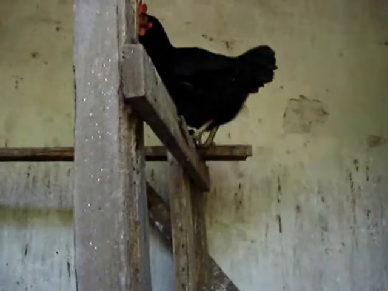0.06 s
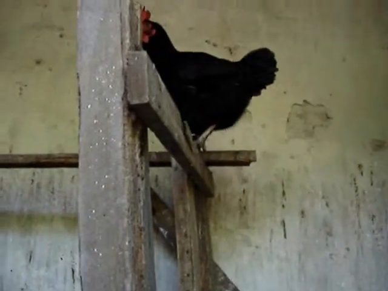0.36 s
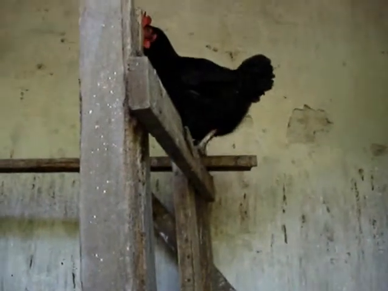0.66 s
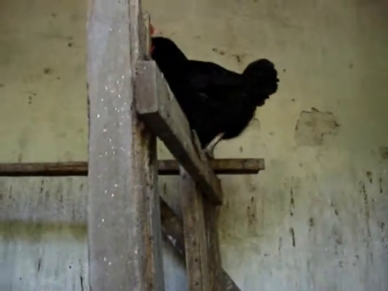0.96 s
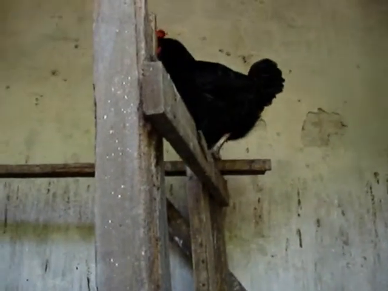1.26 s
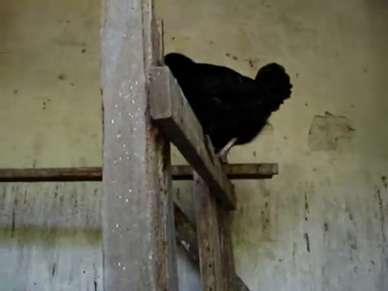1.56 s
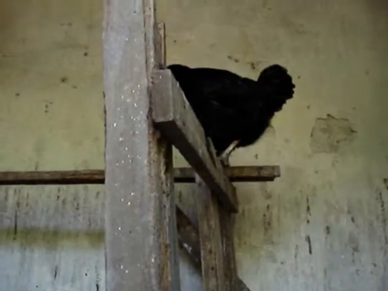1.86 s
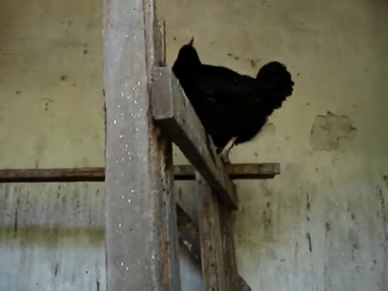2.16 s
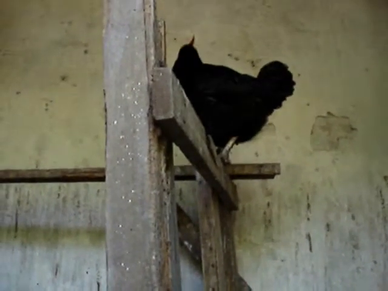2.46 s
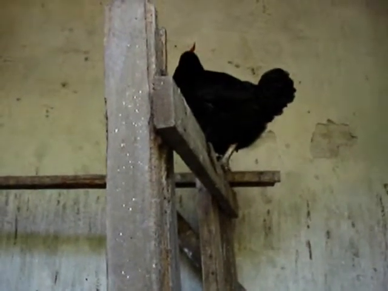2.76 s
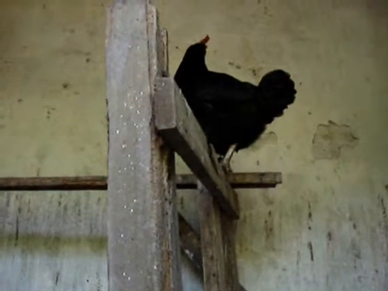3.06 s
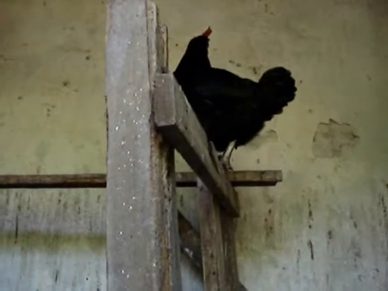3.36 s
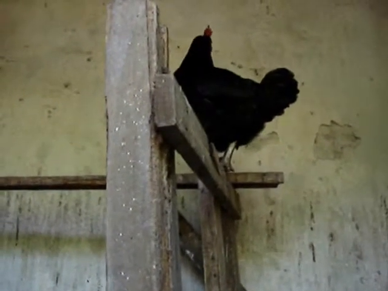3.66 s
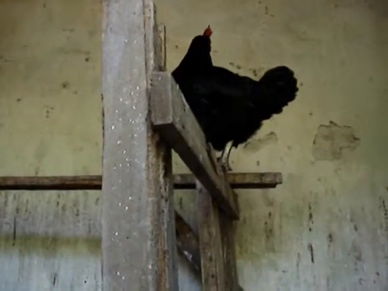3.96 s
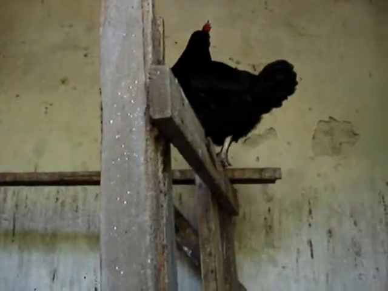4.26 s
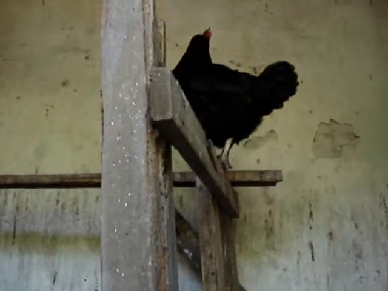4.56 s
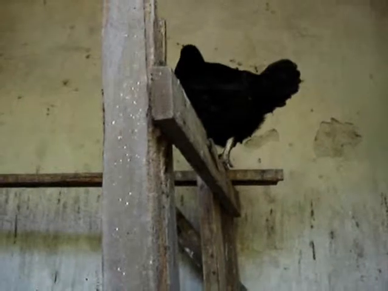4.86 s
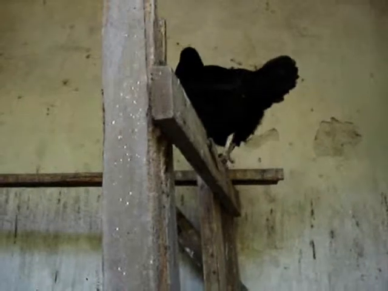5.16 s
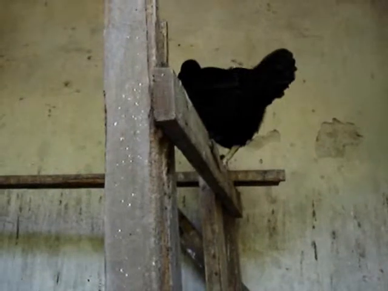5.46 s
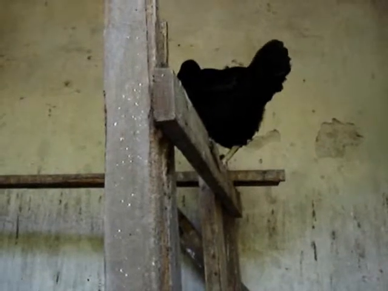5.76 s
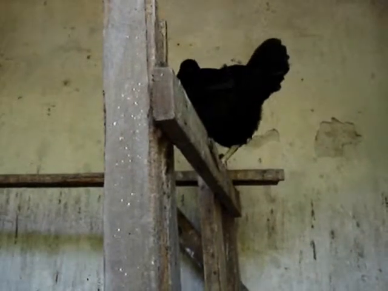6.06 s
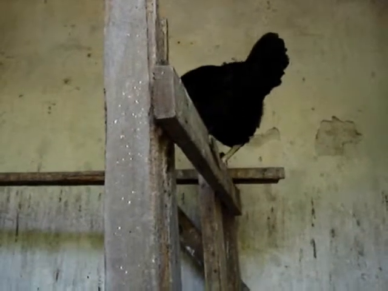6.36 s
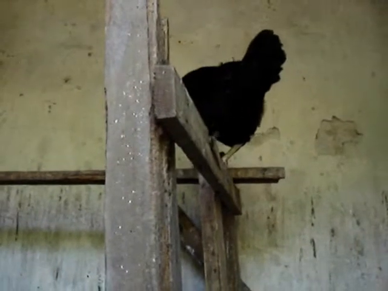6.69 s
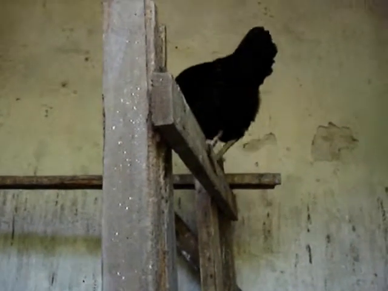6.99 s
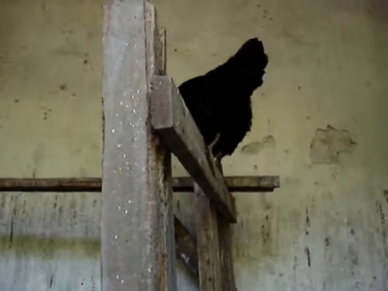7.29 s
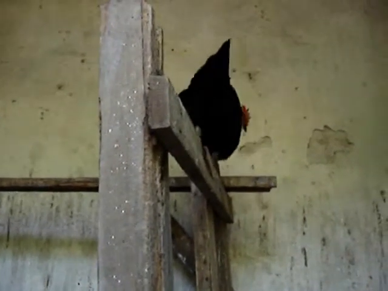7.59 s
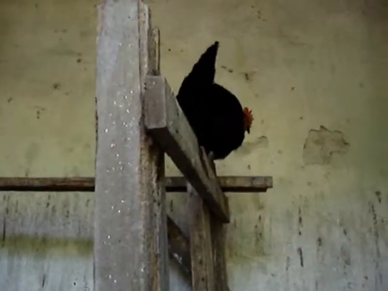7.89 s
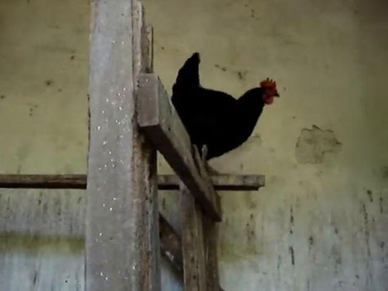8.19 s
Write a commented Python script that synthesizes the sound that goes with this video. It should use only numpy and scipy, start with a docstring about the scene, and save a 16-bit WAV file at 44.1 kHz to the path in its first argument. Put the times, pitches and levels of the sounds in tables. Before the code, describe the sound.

A hen calls nearby in a small coop whose hard walls add a short echo, over a faint, dull, steady outdoor background. She gives a tiny call right at the start. From 0.2 to 1.6 seconds she holds one long wavering note, thin and high at first, then lower, louder and gritty, breaking into a rasp. From about 1.7 to 6 seconds comes a run of about a dozen short falling notes, roughly three a second, the first ones the loudest. Most open with a soft throaty cluck and a hoarse catch, and end roughly. The last, near 5.8 seconds, is especially rattly. After a second of only background, from about 7 to 8 seconds her feet make several faint, grainy scrapes on the wooden perch, with light swishes of feathers as she turns.

```python
"""In a small plastered coop, with a dull yard behind, a hen on a perch gives a brief call and one long
wavering note, then a run of short falling ones with soft clucks. Her voice box (the syrinx) starts most
notes with a hoarse catch, clears, adds a tone at half the pitch ("doubling") and ends in a rasp. Then she
turns round, feet scraping and feathers rustling, and the walls echo it all. A small camera holds each of
its samples until the next, which mirrors her voice faintly into the top treble."""
import sys
import numpy as np
from scipy import signal
from scipy.fft import rfft, irfft, next_fast_len
from scipy.io import wavfile
from scipy.ndimage import map_coordinates

SR = 44100
rng = np.random.default_rng(int(sys.argv[2]) if len(sys.argv) > 2 else 0)


def inscribe(sig):
    """Save sig as 16-bit PCM at rate SR to the path in sys.argv[1].

    A 1-D sig is mono; a 2-D sig holds one channel per row.
    Samples are clipped to [-1, 1] before scaling.
    """
    pcm = np.round(np.clip(np.atleast_2d(sig).T, -1, 1) * 32767)
    wavfile.write(sys.argv[1], SR, pcm.astype(np.int16))


N = 362972
TIME = np.arange(N) / SR


def from_db(db):
    """Turn decibels into a number to multiply by."""
    return 10 ** (np.asarray(db) / 20)


def unit_power(x):
    """Scale a signal so that its average power is 1."""
    return x / np.sqrt(np.mean(x ** 2) + 1e-20)


def curves_at(rows, t):
    """Read each column of a table at the times t; the first column is time."""
    times, *columns = np.transpose(rows)
    return [np.interp(t, times, column) for column in columns]


def gain_at(spectrum, hz):
    """How strongly a spectrum passes each frequency; it falls away steeply past its ends."""
    points_hz, db = np.transpose(spectrum)
    hz = np.maximum(hz, 1)
    roll_off = np.minimum(1, np.minimum(hz / points_hz[0], points_hz[-1] / hz)) ** 2
    return from_db(np.interp(np.log(hz), np.log(points_hz), db)) * roll_off


def coloured(noise, spectrum):
    """Give noise the tone colour of a spectrum, at power 1."""
    size = next_fast_len(len(noise))
    hz = np.arange(size // 2 + 1) * SR / size
    return unit_power(irfft(rfft(noise, size) * gain_at(spectrum, hz), size)[:len(noise)])


def flutter(rate_hz, size):
    """Smooth random wavering, up to about rate_hz, at power 1."""
    position = np.arange(size) * 2 * rate_hz / SR + rng.random()
    points = rng.standard_normal(int(position[-1]) + 8)
    return unit_power(map_coordinates(points, [position + 2], order=3))


def burst(start_s, rise_s, decay_s):
    """A loudness curve that swells quickly and dies away."""
    age = np.maximum(TIME - start_s, 0)
    decay = np.minimum(np.maximum(age - rise_s, 0) / decay_s, 20)
    return np.minimum(age / rise_s, 1) * np.exp(-decay)


def times_between(start_s, end_s):
    """The sample times between two moments."""
    return TIME[(TIME > start_s) & (TIME < end_s)]


def after(t, moment_s, change_s=.028):
    """A ramp from 0 to 1 around a moment: the voice takes a little time to change state."""
    return np.clip((t - moment_s) / change_s + .5, 0, 1)


def yard():
    """Steady, dull outdoor background noise."""
    # the yard's tone colour: frequency_hz, gain_db
    colour = [(15, -52), (25, -12.5), (101, -6), (253, -6.5), (315, -0.5), (400, -3.5), (509, -5.5),
              (762, -6.5), (2360, -22), (6550, -29), (8130, -26), (15500, -55)]
    # its loudness: time_s, level_db
    loudness = [(2,-41),(3,-45),(6.7,-45.5),(8.2,-44)]
    level_db, = curves_at(loudness, TIME)
    return from_db(level_db) * coloured(rng.standard_normal(N), colour)


def syrinx(t, pitch_hz, level_db, overtones_db, throat_hz, bright_db, hoarseness, doubles_at_s,
           doubling, final_rasp, rattle, tremor=.0079, waver_db=1.17, harden_db=13, harden_share=.73):
    """One note: the voice box catches, buzzes, doubles as every other cycle differs, then rasps."""
    # how the throat and beak ring at rest, low down and higher up: frequency_hz, gain_db
    throat = [(290,-22),(480,-20.5),(800,1.5),(1100,4),(1400,3.5),(1700,-10.5),(2000,-19.5),(2500,-27.5),(3200,-31)]
    upper_resonance = [(1900,5),(2400,-11),(3050,-5),(3430,5.5),(3750,-3.5),(4300,-11),(5000,-31),(5850,-10),(7200,-34),(9000,-22),(15000,-34.5)]
    # the voice cracks with a few very strong cycles: time_s, extra_db
    cracks = [(2.061, 2), (5.502, 8), (5.931, 9)]
    onset_s, break_s, crack_s, attack_s, release_s = .051, .072, .0053, .0052, .01
    rattle_hz, resting_throat_hz = 51.77, 1170
    size = len(t)

    catching = hoarseness * (1 - after(t, t[0] + onset_s))
    broken = final_rasp * after(t, t[-1] - break_s)
    rasp = .095 + np.maximum(np.maximum(catching, broken), .21 * rattle)
    # a rattling voice box throbs unevenly
    throb_hz = rattle_hz * (1 + flutter(39.5, size) / 2)
    throb = rattle * np.sin(2 * np.pi * np.cumsum(throb_hz) / SR)
    pitch_hz = pitch_hz * (1 - .0593 * broken)  # the final rasp pulls the pitch down
    wobble = .0475 * rasp * flutter(240, size) + tremor * flutter(42.2, size) + .011 * throb
    phase = 2 * np.pi * np.cumsum(pitch_hz * (1 + wobble)) / SR

    # partials are the pure tones in a note; doubling adds some halfway between the usual ones
    multiples = np.arange(.5, 20, .5)[:, None]
    halfway = multiples % 1 > 0
    strength = np.where(halfway, doubling * after(t, doubles_at_s) + catching, multiples > 1)
    strength = strength * from_db(.11 * bright_db * np.minimum(multiples, 4))
    # in a rattle the doubling slips out of step, and uneven cycles fray each partial
    slip = halfway * .75 * rattle * flutter(36, size)
    unevenness = .55 * rattle
    wavers = np.array([flutter(70, size) for _ in range(5)])
    fray = unevenness * wavers[np.arange(len(multiples)) % 5]
    start_phases = rng.uniform(0, 2 * np.pi, multiples.shape)
    partials = (1 + fray) * np.sin(multiples * phase + slip + fray[::-1] + start_phases)
    partials = partials / np.sqrt(1 + unevenness ** 2)

    def through(resonance, air_share, shift=1):
        """The buzz and the air that escapes on each cycle, shaped by one resonance."""
        gains = gain_at(resonance, multiples * (pitch_hz / shift)[::32])
        gains = strength * np.repeat(gains, 32, axis=1)[:, :size]
        buzz = (gains * partials).sum(axis=0) / np.sqrt((gains ** 2).sum(axis=0) / 2)
        puffs = rng.standard_normal(size) * (1 + np.cos(phase))
        air = coloured(puffs, [(hz * np.mean(shift), db) for hz, db in resonance])
        return (buzz + air_share * air) / np.sqrt(1 + air_share ** 2)

    # the pulses harden as the note goes on, adding a flickering bright edge that cracks do not lift
    hardening = np.minimum(np.linspace(0, 1, size) / harden_share, 1)
    crack_db = sum(db * np.exp(-((t - time_s) / crack_s) ** 2) for time_s, db in cracks)
    edge_db = -26 + bright_db + harden_db * hardening - 2.5 * broken
    edge_db = edge_db + 1.5 * flutter(34.45, size) - crack_db
    # stretching the neck shifts the throat's resonance
    body = through(throat, from_db(-11) * 2 * rasp, shift=throat_hz / resting_throat_hz)
    edge = from_db(edge_db) * through(upper_resonance, from_db(1) * (rattle + rasp + catching))
    # the beak starts half closed, which muffles the overtones
    overtones = from_db(overtones_db - 12 * np.exp(-(t - t[0]) / onset_s))
    voice = (np.sqrt(2) * np.sin(phase) + overtones * (body + edge)) / np.hypot(1, overtones)

    fades = np.clip((t - t[0]) / attack_s, 0, 1) * np.clip((t[-1] - t) / release_s, 0, 1)
    level_db = level_db + waver_db * flutter(33.8, size) + 3 * throb + crack_db
    shimmer = 1 + .26 * rasp * flutter(45, size)
    out = np.zeros(N)
    first = np.searchsorted(TIME, t[0])
    out[first:first + size] = from_db(level_db) * voice * fades * shimmer
    return out


def cackles():
    """Short notes slide to a held pitch, start doubling, then sag; each swells and fades."""
    # one row a note: start_s, length_s, opening_hz, slide_s, held_hz, sag_hz_per_s, level_db (relative),
    # swell_s, swell_db, overtones_db, throat_hz, bright_db, then 0 to 1: hoarseness, doubling,
    # final_rasp, rattle
    notes = [(0.036, 0.0522, 636, 0.032, 547, 504, -26.5, 0.021, 6.5, 8.5, 1040, -16, 0.02, 0.5, 0.57, .2),
             (1.74, 0.0378, 1051, 0.0307, 1080, 300.6, -13, 0.0094, 4, -22, 1106, -10, 0.2, 0.21, 0.07, 0.3),
             (1.797, 0.3, 790.6, 0.041, 710, 114, -8.5, 0.31, 10, 2, 1096, 0.5, 0.13, 1, 0.22, 0.21),
             (2.221, 0.041, 997, 0.015, 1048, 300, -14.5, 0.015, 6, -11, 1110, -3, 0.12, 0.26, 0, 0.1),
             (2.24, 0.31, 762, 0.12, 554.2, 68.3, -11, 0.097, 16.5, 9, 1170, -1, 0.88, 0.31, 0.43, 0.33),
             (2.653, 0.28, 726.5, 0.078, 574.3, 213.6, -11, 0.1, 17.5, 9.5, 1190, 2, 0.53, 0.21, 0.57, 0.2),
             (3.044, 0.19, 751.4, 0.1, 567.2, 254, -11.5, 0.11, 13, 6.5, 1190, 0, 0.54, 0.19, 0.31, 0.44),
             (3.352, 0.036, 1064, 0.019, 1020, 300, -19, 0.013, 9.5, -7, 1100, 0, 0.3, 0.2, 0.02, .2),
             (3.366, 0.228, 708, 0.052, 538, 382.5, -14.5, 0.05, 18, 8, 1180, 4, 0.47, 0.18, 0.6, 0.4),
             (3.701, 0.209, 737.4, .057, 554.7, 386, -13.5, 0.09, 8.5, 7, 1224, 3.5, 0.57, 0.22, 0.28, 0.5),
             (4.026, 0.2284, 694, 0.04174, 526, 300.5, -13.5, 0.0645, 11.5, 9, 1143, 5.5, 0.23, 0.22, 0.49, 0.51),
             (4.376, 0.2, 659, .047, 489.9, 180, -15.5, 0.029, 13.5, 10, 1154, 6.5, 0.09, 0.12, 0.26, 0.15),
             (4.68, 0.22, 644.3, 0.044, 513.7, 235, -12.5, 0.034, 18, 8.5, 1123, 1.5, 0.27, 0.12, 0.41, 0.39),
             (4.997, .2, 756.8, 0.064, 590, 299, -12.5, 0.098, 17, 9.5, 1064, -3, 0.44, 0.83, 0.48, 0.31),
             (5.322, 0.22, 755, 0.067, 602.4, 58, -14.5, 0.15, 11, 10, 1120, 1, 0.37, 0.9, 0.61, 0.48),
             (5.782, 0.2, 671.6, 0.048, 600.3, 51, -14.5, 0.18, 2.5, 11.5, 1130, -1, 0.13, 0.56, 0.52, 0.74)]
    fade_share, fade_db = .25, 12
    out = np.zeros(N)
    for (start_s, length_s, opening_hz, slide_s, held_hz, sag_hz_per_s, level_db, swell_s, swell_db,
         overtones_db, throat_hz, bright_db, hoarseness, doubling, final_rasp, rattle) in notes:
        t = times_between(start_s, start_s + length_s)
        age = t - start_s
        slide_hz = (opening_hz - held_hz) * np.maximum(1 - age / slide_s, 0)
        pitch_hz = held_hz + slide_hz - sag_hz_per_s * np.maximum(age - slide_s, 0)
        fading = np.maximum(1 - (1 - age / length_s) / fade_share, 0)
        level_db = level_db - swell_db * np.maximum(1 - age / swell_s, 0) - fade_db * fading
        # the beak opens and closes, lifting the throat's resonance at its widest
        gape = np.sin(np.pi * age / length_s)
        throat_hz = throat_hz * (1 + .064 * (gape - gape.mean()))
        rattle = rattle * after(t, start_s + slide_s / 2)
        out += syrinx(t, pitch_hz, level_db, overtones_db, throat_hz, bright_db, hoarseness,
                      start_s + slide_s, doubling, final_rasp, rattle)
    return out


def long_note():
    """A drawn-out tone that gathers strength, doubles faintly and breaks at the end."""
    # a thin high start sinks to a held tone: time_s, pitch_hz
    melody = [(.187,681),(0.211,682),(0.223,891),(0.409,770.6),(0.508,796),(0.539,734),(.65,622),(0.709,604.7),(0.786,652.6),(0.876,607),(0.951,636.4),(1.012,603.7),(1.115,654.3),(1.51,664.2),(1.544,608),(1.61,618)]
    # the note's loudness, swelling and dipping in the room as the pitch moves: time_s, level_db (relative)
    loudness = [(0.187, -18.5), (0.193, -27), (0.563, -27.5), (0.655, -14), (0.705, -12), (0.741, -18.5),
                (0.789, -14.5), (0.831, -21), (0.875, -10.5), (0.927, -17), (0.939, -23), (1.017, -8.5),
                (1.061, -18), (1.125, -10.5), (1.247, -16.5), (1.251, -14), (1.517, -11), (1.601, -15.5),
                (1.61, -23)]
    # the beak opens wider, from hoot to cackle: time_s, overtones_db (compared with the main tone)
    beak = [(.2,8),(.25,-20),(.45,-9.5),(.56,0),(.66,-9),(1.02,-1),(1.1,-4),(1.5,-4),(1.57,16)]
    # gritty on the way down, calmer, then rough again: time_s, rattle (0 to 1), doubling (0 to 1)
    roughness = [(.45,0.23,0),(.58,0.48,0),(1.05,0.23,0.05),(1.4,0.26,0.17),(1.53,0.35,0.43)]
    t = times_between(melody[0][0], melody[-1][0])
    pitch_hz, = curves_at(melody, t)
    level_db, = curves_at(loudness, t)
    overtones_db, = curves_at(beak, t)
    rattle, doubling = curves_at(roughness, t)
    return syrinx(t, pitch_hz, level_db, overtones_db, throat_hz=1079, bright_db=-8.5, hoarseness=.054,
                  doubles_at_s=t[0], doubling=doubling, final_rasp=.26, rattle=rattle,
                  tremor=.018, waver_db=1.9, harden_db=22.5, harden_share=.94)


def clucks():
    """Soft, toneless knocks of air in the throat as the beak opens before a note."""
    # one row a knock: start_s, level_db (relative)
    knocks = [(1.723, -2.5), (2.199, -7), (2.642, -10.5), (3.024, -8.5), (3.336, -14.5), (3.685, -13),
              (4.014, -18), (4.358, -11.5), (4.668, -13.5), (4.994, -7.5), (5.311, -9), (5.714, -17.5)]
    # their tone colour: frequency_hz, gain_db
    colour = [(400,-16),(750,6),(1100,-3.5),(1500,-17),(3000,-27.5)]
    loudness = sum(from_db(db - 14.5) * burst(start_s, rise_s=.01, decay_s=.014)
                   for start_s, db in knocks)
    return loudness * coloured(rng.standard_normal(N), colour)


def rustles():
    """Feet scrape the wood and feathers swish as she turns: a grainy brush for each movement."""
    # her movements: start_s, feet_db, feathers_db (both relative), decay_s
    moves = [(6.96, -40, -62, .04), (7.198, -33.5, -51, .035), (7.392, -35, -64.5, .025),
             (7.462, -32, -44, .018), (7.555, -34.5, -43.5, 0.042), (7.652, -39, -46.5, 0.12),
             (7.9, -34, -52, .03), (7.945, -34, -63, .025)]
    # tone colours of feet and of feathers: frequency_hz, gain_db
    scrape = [(1500,0),(2500,2.5),(4000,-11)]
    swish = [(4000,1.5),(8000,0.5),(11000,-15),(15000,-20)]
    starts_s, feet_db, feathers_db, decays_s = np.transpose(moves)
    out = np.zeros(N)
    for levels_db, colour in (feet_db - 14.5, scrape), (feathers_db - 6, swish):
        loudness = sum(from_db(db) * burst(start_s, rise_s=.006, decay_s=decay_s)
                       for start_s, db, decay_s in zip(starts_s, levels_db, decays_s))
        grains = rng.standard_normal(N) * from_db(3 * flutter(254, N))
        out += loudness * coloured(grains, colour)
    return out


def coop(sound, ring_s=.29, tail_db=-7, wall_cutoff_hz=3900):
    """Dull slaps off the nearest walls, then a short tail of echoes going back and forth."""
    # echoes off the nearest walls: delay_s, gain
    walls = [(.0083,0.12),(.0165,0.5),(.0229,.2)]
    hz = np.arange(SR // 2 + 1)
    delayed = lambda delay_s: np.exp(-2j * np.pi * hz * delay_s)
    round_trips_s = np.geomspace(.0198, .047, 12)
    trips = [from_db(-60 * trip_s / ring_s) * delayed(trip_s) for trip_s in round_trips_s]
    echoes = sum((-1) ** k * trip / (1 - trip) for k, trip in enumerate(trips))
    for scatter_s in .0013, .0037:  # the beams scatter each echo
        echoes = echoes * (delayed(scatter_s) - .6) / (1 - .6 * delayed(scatter_s))
    dulling = gain_at([(100, -3.5), (4000, -11.5), (12000, -15)], hz)
    tail = irfft(echoes * dulling)[:SR // 2]
    tail *= from_db(tail_db) / np.sqrt(2 * np.sum(tail ** 2))
    slaps = sum(gain * np.interp(TIME - delay_s, TIME, sound, left=0) for delay_s, gain in walls)
    slaps = signal.sosfilt(signal.butter(1, wall_cutoff_hz, fs=SR, output="sos"), slaps)
    return sound + slaps + signal.fftconvolve(sound, tail)[:N]


def scene():
    """The hen in her coop, with the yard behind."""
    voice = from_db(-3) * (long_note() + cackles())
    return (coop(voice + clucks() + rustles()) + yard())[None]


def record(dry):
    """The loudest peaks are gently rounded off; the camera holds each sample and cuts the top treble."""
    peak_limit, camera_rate_hz, cutoff_hz = .85, 32000, 15750
    rounded = dry[0] / (1 + (dry[0] / peak_limit) ** 8) ** (1 / 8)
    held_at = np.floor(TIME * camera_rate_hz) * SR / camera_rate_hz
    held = map_coordinates(rounded, [held_at], order=3, mode="nearest")  # adds faint mirror tones
    treble_cut = signal.ellip(12, .1, 80, cutoff_hz, fs=SR, output="sos")
    return signal.sosfilt(treble_cut, held)[None]


dry = scene()
out = record(dry)
inscribe(out)
```